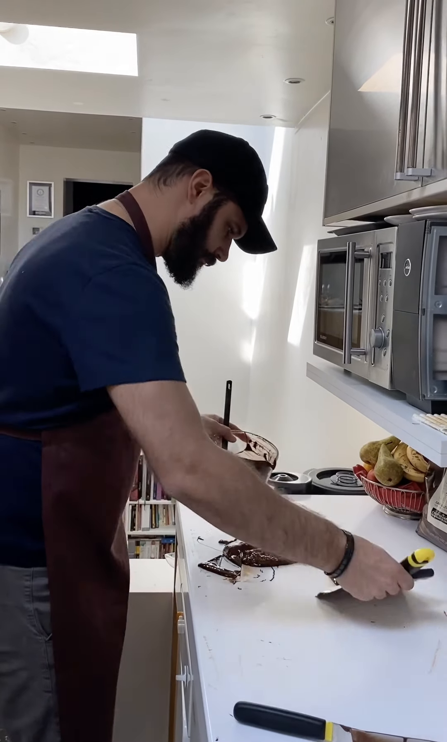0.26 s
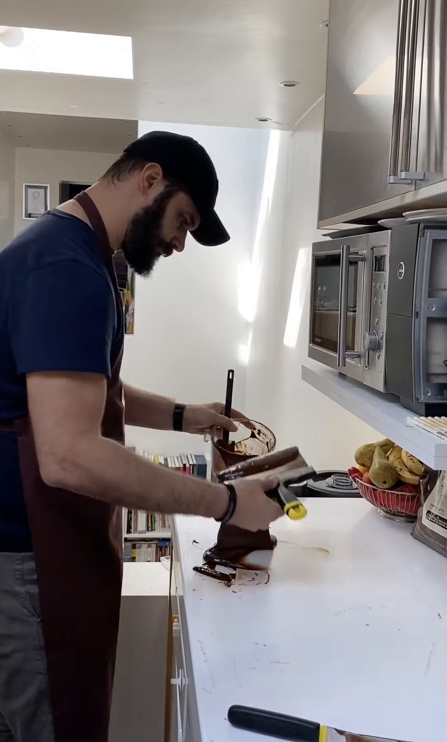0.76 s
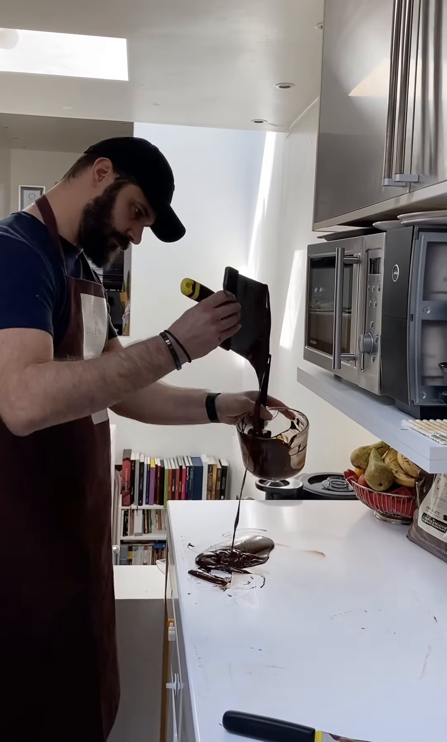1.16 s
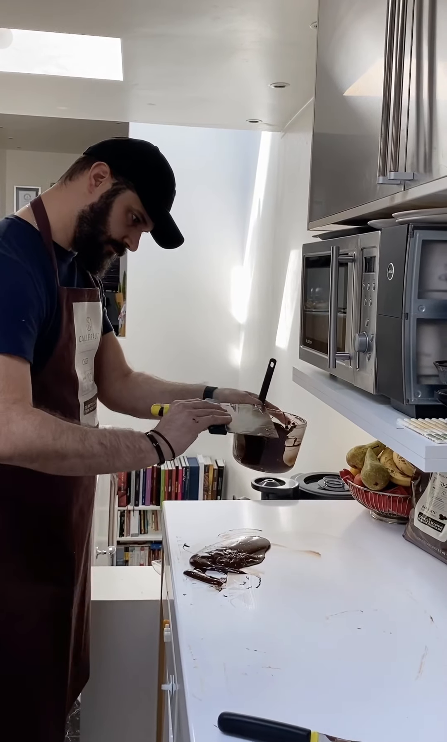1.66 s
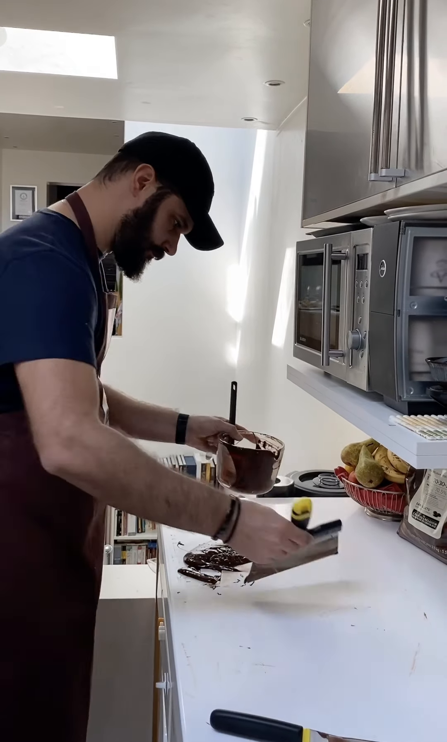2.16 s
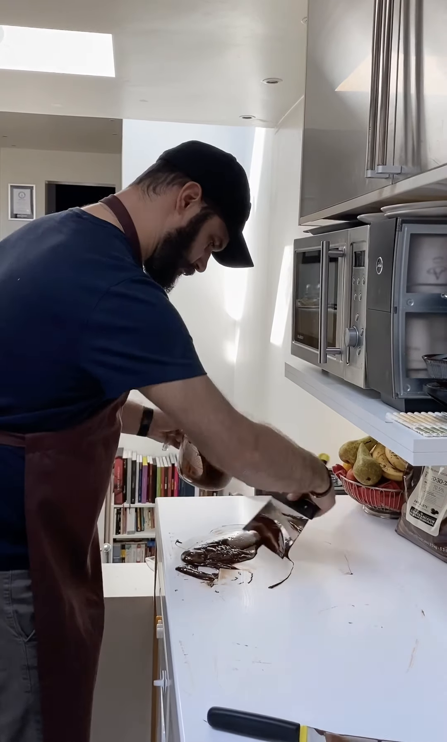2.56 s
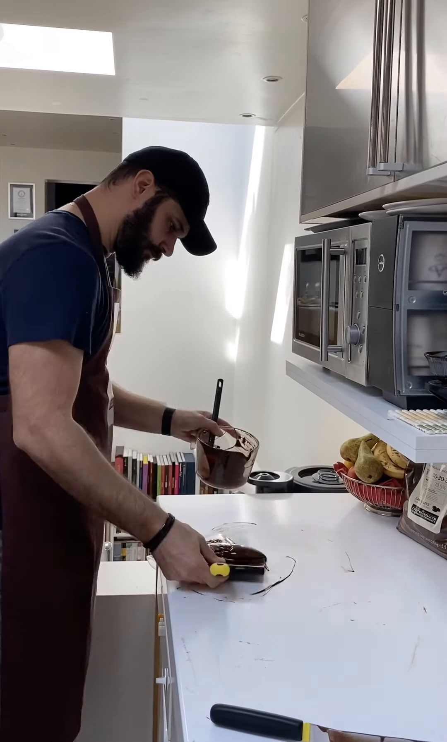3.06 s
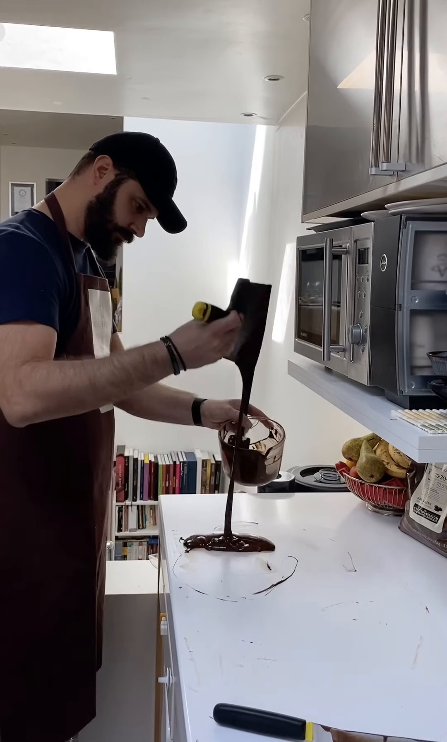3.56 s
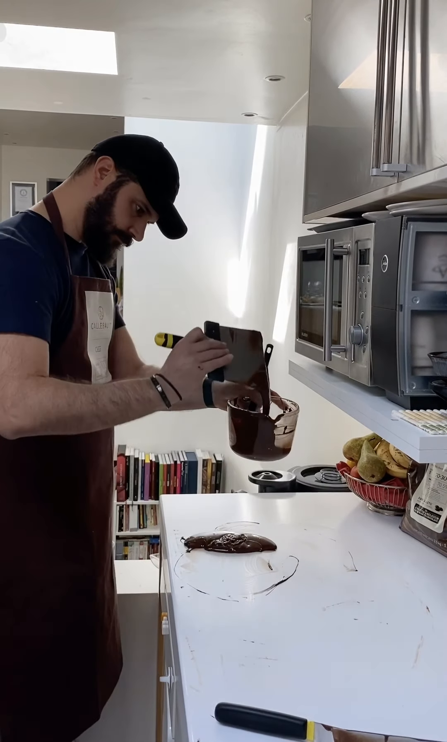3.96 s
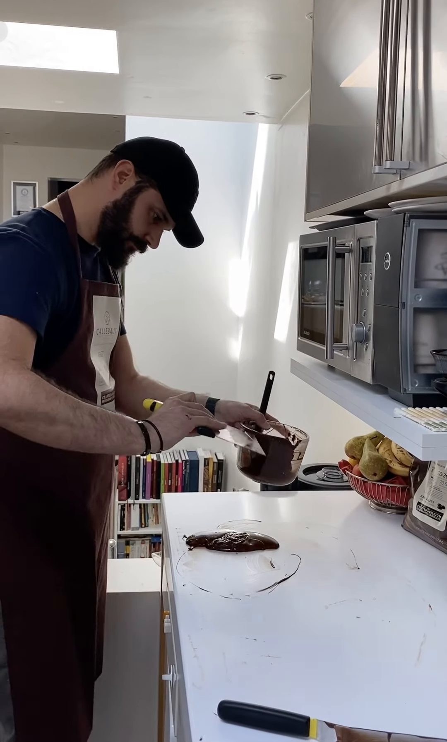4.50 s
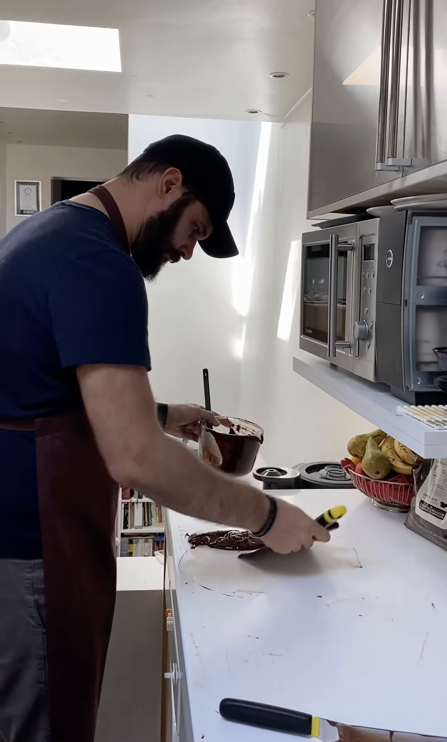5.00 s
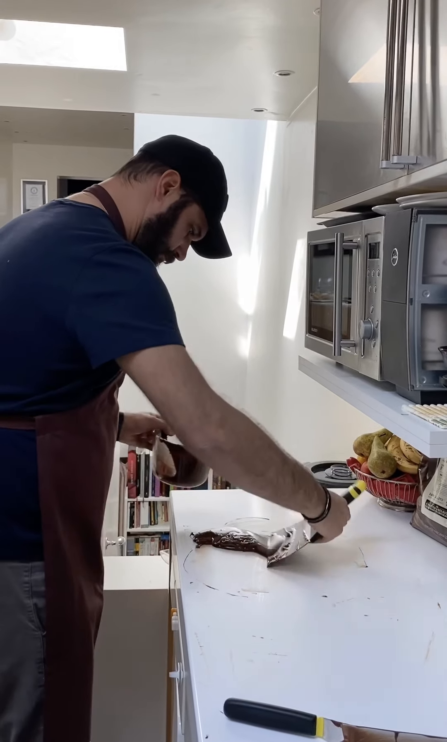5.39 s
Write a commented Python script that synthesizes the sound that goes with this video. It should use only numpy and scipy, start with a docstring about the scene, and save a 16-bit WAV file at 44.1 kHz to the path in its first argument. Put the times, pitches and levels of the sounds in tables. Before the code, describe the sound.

A lively hard-surfaced kitchen heard in stereo from fairly near, with a very quiet low refrigerator hum and soft fan rush throughout. After a slight touch near 0.06 s, a steel scraper strikes the worktop at about 0.13 s with a very loud, sharp, ringing clack, then sweeps with a bright gritty hiss and hollow drone until about 0.5 s. Soft, nearly inaudible chocolate smears follow, with light ticks and wiping on a bowl rim around 1.4-1.9 s. At 2.25 s a weaker, rapidly rattling clack begins a longer fading scrape, with dull knocks around 2.6-2.75 s and another push at 2.85-3.1 s ending in a low thud. Quiet wiping returns around 3.9-4.2 s, then a crisp tick at 4.46 s and dull knocks. At 4.77 s another loud clack starts a scrape, with a small upward squeak near 4.95 s, a further stroke around 5.1-5.5 s and a short final one.

```python
"""In a hard-walled kitchen, a steel scraper works melted chocolate on the worktop.
Three times it clacks down (short pulses that set slab and blade ringing) and is dragged across (noise of tiny slips).
Between the strokes the blade is wiped on the rim of a bowl (soft noise), with light ticks and slides and dull knocks.
Thuds and faint gliding noise join in, the room rings briefly, and refrigerators hum (wandering tones, soft noise)."""
import sys
import numpy as np
from scipy import signal
from scipy.fft import rfft, irfft
from scipy.io import wavfile
from scipy.ndimage import uniform_filter1d

SR = 44100
rng = np.random.default_rng(int(sys.argv[2]) if len(sys.argv) > 2 else 0)


def persist_wave(psi):
    """Save psi, clipped to +-1, as 16-bit WAV."""
    counts = np.round(np.clip(psi, -1, 1) * 32767).astype(np.int16)
    wavfile.write(sys.argv[1], SR, np.atleast_2d(counts).T)


N = 248724
TIME = np.arange(N) / SR
TAIL = SR * 3 // 5  # samples of ringing kept after a contact

# Blade meets worktop: (time [s], strength [dB], treble [dB], flatness [0 on a corner - 1 on the whole edge],
# blade rattle against the blow [dB], contacts [count], time between contacts [s])
CLACKS = [(0.0638, -13, -4, 1, -10, 1, 0), (0.1289, 12.5, -2.5, .03, -12.5, 1, 0.019),
          (0.1466, 3.5, -2.5, .15, -3, 1, 0), (2.2465, 0.5, -2, 0.52, -6, 4, .0031),
          (2.2917, -10.5, -16, .05, -14, 2, .0068), (4.7382, -9.5, -24, 1, -0.5, 1, 0),
          (4.7678, 10, -8, 0.19, -6, 2, 0.0038)]
# Tone colour of the blow: (frequency [Hz], level [dB])
CLACK_COLOUR = [(30, -25.5), (60, -12.5), (110, -17), (170, -12), (300, -17.5), (520, -12.5), (790, -2.5),
                (1220, -5.5), (1550, -15.5), (1950, -6), (2400, -19), (3800, -11.5), (7000, -21.5),
                (15000, -36.5)]
# Tone colour of the blade's rattle: (frequency [Hz], level [dB])
RATTLE_COLOUR = [(300, -24), (1400, -5), (2000, -2), (2500, -1.5), (3800, -2), (6000, -2), (9000, -11.5),
                 (15000, -18.5)]
# Ringing of worktop and blade: (frequency [Hz], relative level [dB], time to fall by 60 dB [s])
RINGING_MODES = [(165.2, -2.5, 0.33), (186, -8, 0.39), (276.7, -14, 0.28), (439, -3, 0.35),
                 (600, -11, 0.32), (749, -2, .35), (813, -1, 0.35), (800, -1.5, 0.13), (936, -5, 0.29),
                 (928, -7.5, 0.37), (1037, -5.5, 0.21), (1179, 2, 0.38), (1203, -3.5, 0.2), (1267, 2, 0.16),
                 (1315, -6, 0.19), (1427, -6, 0.4), (1421, -14.5, 0.15), (1883, -10.5, .3),
                 (1830, -11, 0.14), (1926, -8.5, .32), (2056, -7.5, 0.23), (2210, -6.5, .35),
                 (2640, -15, 0.52), (2920, -19.5, 0.38), (2876, -16.5, .33), (4060, -7.5, .47),
                 (4100, -11, 0.27), (5663, -16.5, .25), (7300, -19, .22)]
# What flatness does to a blow: (on a corner [dB], on the whole edge [dB])
BASS_DB, RINGING_DB, ROOM_DB = (-6, 15), (-45, -50), (-7, 2)
BOUNCE_LOSS_DB_PER_S = 516  # later contacts of one clack are weaker


def clacks(ring_rise=0.0039, ring_lean_db=-0.8, rattle_time=0.0065):
    """The edge strikes, rattles and bounces; slab and blade ring on. A flat landing is deeper and more diffuse."""
    out, t = np.zeros((2, N)), TIME[:TAIL]
    mode_hz, mode_db, t60 = np.transpose(RINGING_MODES)[:, :, None]
    swing = np.exp((2j * np.pi * mode_hz - np.log(1000) / t60) * t)
    modes = amp(mode_db) * swing * (1 - np.exp(-t / ring_rise))
    signs = (-1) ** np.arange(len(RINGING_MODES))  # neighbours swing oppositely
    ring_lean = amp([[ring_lean_db], [-ring_lean_db]])  # left, right
    for s, strength_db, treble_db, flatness, rattle_db, count, gap in CLACKS:
        bass_db = np.interp(flatness, [0, 1], BASS_DB)
        ringing_db = np.interp(flatness, [0, 1], RINGING_DB)
        room_db = np.interp(flatness, [0, 1], ROOM_DB)
        blow = click(CLACK_COLOUR, treble_db, bass_db)
        size = len(blow)
        for delay in gap * np.arange(round(count)):
            db = strength_db - BOUNCE_LOSS_DB_PER_S * delay
            chatter = rng.standard_normal(size) * np.exp(-t[:size] / rattle_time)
            rattle = steel(signal.fftconvolve(chatter, click(RATTLE_COLOUR, 0, 0))[:size])
            strike = blow + amp(rattle_db) * rattle / np.linalg.norm(rattle)
            add(out, s + delay, amp(db) * kitchen(strike, room_db))
            # each mode radiates in its own direction, so its timing differs left and right
            arrival = rng.uniform(-0.00011, 0.000059, (2, len(RINGING_MODES)))
            ring = (np.exp(2j * np.pi * mode_hz.T * arrival) * signs @ modes).imag
            add(out, s + delay, amp(db + ringing_db) * ring_lean * ring)
    return out


# Tone colour of the dragged edge: (frequency [Hz], level [dB])
HISS_COLOUR = [(300, -38.5), (1500, -13), (2300, -4.5), (2850, -3.5), (3300, -0.5), (4200, 0.5), (5000, -3),
               (5700, 0.5), (7500, -4), (10000, -5.5), (13000, -5.5), (16000, -5.5)]
# Tone colour of the droning worktop: (frequency [Hz], level [dB])
DRONE_COLOUR = [(100, -18.5), (250, -6), (500, -10), (820, -2), (1000, -1.5), (1180, 0.5), (1400, -5.5),
                (1620, -8), (2000, -1.5), (2500, -8), (4000, -24.5), (10000, -48)]
# Pushes of the blade over the worktop: (start [s], speeding up [s], slowing down [s], hiss [dB],
# brightness: treble up and the rest down by this [dB], worktop drone [dB])
PUSHES = [(0.135, 0.16, 0.17, -32.5, 1.1, -47), (2.25, 0.013, 0.62, -39, 2, -54.5),
          (2.5, 0.29, 0.23, -47.5, 1.5, -61.5), (2.84, 0.17, 0.093, -39, 0, -53),
          (4.77, 0.09, 0.42, -37.5, 3, -51.5), (5.11, 0.26, 0.17, -44, 1.5, -57.5),
          (5.495, 0.094, 0.14, -44, -0.5, -51)]
SPEED_POWER = 2.18  # the gain of the friction noise follows this power of the speed


def strokes(split_hz=5600, drone_power=.85, brightening=.12):
    """The dragged edge hisses, brighter with its speed and angle, and sets the worktop droning."""
    hiss = unit(steel(friction(HISS_COLOUR, 8000, 1.2, 0.785, 2.6)))
    drone = friction(DRONE_COLOUR, 1500, 2.4, 0.99, 2.6)
    dull = signal.sosfiltfilt(signal.butter(2, split_hz, fs=SR, output="sos"), hiss)
    bright = hiss - dull
    dull_gains, bright_gains, drone_gains = [], [], []
    for start, speeding, slowing, hiss_db, bright_db, drone_db in PUSHES:
        edge = movement(start, speeding, slowing, SPEED_POWER)
        dull_gains.append(amp(hiss_db - bright_db) * edge ** (1 - brightening))
        bright_gains.append(amp(hiss_db + bright_db) * edge ** (1 + brightening))
        drone_gains.append(amp(drone_db) * movement(start, speeding, slowing, drone_power))
    return dull * together(dull_gains) + bright * together(bright_gains) + drone * together(drone_gains)


# Faint bands of gliding noise in the strokes and wipes, from narrow squeaks to broad swells:
# (start [s], length [s], starting pitch [Hz], width [Hz], rms before fades and room [dB])
GLIDES = [(0.198, 0.19, 1107, 300, -54.5), (0.26, 0.077, 5760, 900, -51), (1.613, 0.032, 1610, 60, -66),
          (2.82, 0.092, 1224, 162, -58.5), (4.928, 0.035, 4222, 120, -44), (4.951, 0.065, 3703, 250, -43.5),
          (5.559, 0.19, 1952, 45, -58.5)]
GLIDE_OCTAVES_PER_S = 0.554  # every band glides upward


def glides():
    """Noise kept in a band around a rising pitch: a narrow band squeaks, a broad one swells softly."""
    out = np.zeros((2, N))
    for start, length, hz, width, db in GLIDES:
        size = max(round(length * SR), 256)
        pitch = hz * 2 ** (GLIDE_OCTAVES_PER_S * TIME[:size])
        turn = np.exp(2j * np.pi * np.cumsum(pitch) / SR)
        noise = ([1, 1j] @ rng.standard_normal((2, SR)))[:size]
        fuzz = signal.lfilter([1], [1, -np.exp(-np.pi * width / SR)], noise)
        band = unit((turn * fuzz).real) * signal.windows.tukey(size, .5)
        add(out, start, amp(db) * kitchen(band, room_db=-2.5))
    return out


# The worktop booms as weight comes on or off: (time [s], level [dB], pitch [Hz], time to fall by 60 dB [s])
THUDS = [(0.136, -46, 61.4, 0.53), (2.248, -32, 178, .25), (2.254, -53, 57, 0.42), (3.079, -39.5, 53, 0.38),
         (4.773, -35, 44.4, 0.26)]


def thuds(rise=.012):
    """Low swings of the worktop: each is a sine that swells quickly and dies away."""
    out = np.zeros(N)
    for s, db, hz, t60 in THUDS:
        t = np.maximum(TIME - s, 0)
        fade = np.exp(-np.log(1000) * t / t60) * (1 - np.exp(-t / rise))
        out += amp(db) * np.sin(2 * np.pi * hz * t) * fade
    return out


# Light ticks and slides of the blade, on the bowl rim or just before it lands:
# (time [s], strength [dB], treble [dB], bass [dB], decay of the slips [s])
TICKS = [(1.419, -43, -14, 0, 0.011), (1.888, -24.5, 2, 11.5, 0.008), (2.192, -39.5, -24, -0.5, 0.026),
         (4.4564, -18, -4.5, -1.5, 0.0057)]
# Tone colour of a tick or slide: (frequency [Hz], level [dB])
TICK_COLOUR = [(200, -20), (900, -4.5), (1700, -7), (2300, -5.5), (3300, 2.5), (4600, -0.5), (6200, 1.5),
               (7400, 1.5), (9000, -4), (15000, -10.5)]


def ticks():
    """Light ticks and slides of the blade: mostly bright, short runs of slips, with much room sound."""
    return taps(TICKS, TICK_COLOUR, room_db=7.0)


# Dull knocks of bowl and handle: (time [s], strength [dB], treble [dB], bass [dB], decay of the contact [s])
KNOCKS = [(1.4425, -32.5, 11.5, -7, 0.0032), (2.635, -36, -5, -25, 0.0091), (2.752, -31, -5.5, 1.5, 0.017),
          (4.526, -27, -5, -6.5, .012), (4.548, -29, -17, 6.5, 0.019), (5.263, -27, 0, 3.5, 0.0058)]
# Tone colour of a knock: (frequency [Hz], level [dB])
KNOCK_COLOUR = [(50, -27), (160, 0), (380, -2), (680, -6), (1100, -17), (3000, -35), (12000, -75)]


def knocks():
    """Bowl and handle touch dully: mostly low pitches, with less room sound."""
    return taps(KNOCKS, KNOCK_COLOUR, room_db=-3.0)


def taps(rows, colour, room_db):
    """A light contact is a short dying run of slips; the room spreads it."""
    out, t = np.zeros((2, N)), np.arange(4096) / SR
    for s, db, treble_db, bass_db, length in rows:
        slips = rng.standard_normal(len(t)) * np.exp(-t / length)
        sound = steel(signal.fftconvolve(slips, click(colour, treble_db, bass_db))[:len(t)])
        # strength sets the level of the room sound; the straight path is room_db below it
        add(out, s, amp(db - room_db) * kitchen(sound / np.linalg.norm(sound), room_db))
    return out


# Wet smears of chocolate on blade and rim:
# (start [s], speeding up [s], slowing down [s], hiss [dB], body [dB])
WIPES = [(0.48, 0.28, 0.28, -74, -70), (0.83, .21, 0.073, -64, -70), (1.41, .02, 0.12, -64.5, -65.5),
         (1.489, 0.066, 0.11, -58, -63), (1.62, 0.13, 0.13, -70.5, -68.5), (1.9, 0.54, 0.28, -66, -70.5),
         (3.1, 0.19, 0.3, -72.5, -71), (3.63, 0.07, 0.044, -79.5, -75), (3.88, 0.37, 0.31, -65, -65.5),
         (4.03, 0.12, 0.092, -56, -64.5)]
# Tone colour of the sliding hiss: (frequency [Hz], level [dB])
WIPE_HISS_COLOUR = [(1000, -18), (2800, -2), (4000, -2.5), (6000, -8.5), (9000, -12.5), (16000, -21.5)]
# Tone colour of the fuller smear: (frequency [Hz], level [dB])
WIPE_BODY_COLOUR = [(200, -24.5), (700, -1.5), (1100, -11), (2100, -4), (3700, -20), (6000, -17),
                    (10000, -33)]


def wipes(body_power=0.61):
    """Soft chocolate slides along the blade and is smeared off on the rim."""
    hiss = friction(WIPE_HISS_COLOUR, 2700, 0.57, 0.32, 4.1)
    body = friction(WIPE_BODY_COLOUR, 1200, 0.94, 0.45, 3.0)
    edge = together([amp(hiss_db) * movement(*timing, SPEED_POWER) for *timing, hiss_db, _ in WIPES])
    smear = together([amp(body_db) * movement(*timing, body_power) for *timing, _, body_db in WIPES])
    return hiss * edge + body * smear


def friction(colour, slips_per_s, size_db, flutter_db, patchy_db):
    """Countless tiny slips of the edge; its narrow resonances come and go as the contact shifts."""
    slipping = rng.random(N) < slips_per_s / SR
    sizes = amp(size_db * np.minimum(rng.exponential(1, N), 4)) * slipping
    grains = sizes * rng.standard_normal((2, N))
    blurred = rng.standard_normal((2, N))  # steady noise: slips smeared by the walls
    z = signal.stft(diffuse(unit(grains) + blurred, colour), nperseg=1024)[2]
    patches = uniform_filter1d(rng.standard_normal(z.shape[1:]), size=3, axis=0)  # over pitch
    patches = unit(uniform_filter1d(patches, size=9, axis=1))  # over time
    shifting = signal.istft(z * amp(patchy_db * patches), nperseg=1024)[1][:, :N]
    return unit(shifting) * amp(flutter_db * wander(35))


LINGER_T60 = 0.44  # s for the noise of a movement to fall by 60 dB in the room


def movement(start, speeding, slowing, power):
    """Gain of one arm movement: the speed rises and falls smoothly, and the room lets the noise linger."""
    coarse = TIME[::64]
    speed = np.sin(np.pi / 2 * np.interp(coarse, np.cumsum([start, speeding, slowing]), [0, 1, 0]))
    keep = np.exp(-2 * np.log(1000) / LINGER_T60 * coarse[1])
    energy = signal.lfilter([1 - keep], [1, -keep], speed ** (2 * power))
    return np.interp(TIME, coarse, np.sqrt(energy))


def together(gains):
    """Overlapping movements add in power."""
    return np.linalg.norm(gains, axis=0)


# The steel blade's own resonances: (frequency [Hz], width [Hz], level over the rest [dB])
BLADE_RESONANCES = [(2830, 160, 3), (3185, 50, 2), (3830, 60, 1.5), (4320, 130, 2.5), (5650, 80, 2),
                    (5880, 200, 2), (6290, 70, 2), (7240, 90, 3), (7430, 50, 2.5), (9210, 90, 2.5)]


def steel(x):
    """Colours a sound with the blade's resonances."""
    size = x.shape[-1]
    hz = np.fft.rfftfreq(size, 1 / SR)
    boost_db = sum(db / (1 + (2 * (hz - f) / width) ** 2) for f, width, db in BLADE_RESONANCES)
    log_gain = np.log(amp(boost_db))
    # causal: it rings after the push
    phase = signal.hilbert(np.r_[log_gain, log_gain[-2:0:-1]]).imag[:len(hz)]
    return irfft(rfft(x) * np.exp(log_gain - 1j * phase), size)


def click(colour, treble_db, bass_db, spread=.0013, treble_hz=2500, bass_hz=400, size=4096):
    """A causal pulse of energy 1; bending waves bring its treble first and its bass later."""
    hz = np.fft.rfftfreq(size, 1 / SR) + 1
    treble = treble_db / (1 + (treble_hz / hz) ** 2)
    bass = bass_db / (1 + (hz / bass_hz) ** 2)
    log_gain = np.log(amp(read(colour, hz) + treble + bass))
    causal = np.conj(signal.hilbert(np.r_[log_gain, log_gain[-2:0:-1]]))[:len(hz)]
    bending = 4 * np.pi * spread * np.sqrt(1000 * hz)  # spread is the delay at 1000 Hz in s
    pulse = irfft(np.exp(causal - 1j * bending))
    return pulse / np.linalg.norm(pulse)


# How long the kitchen rings: (frequency [Hz], time to fall by 60 dB [s])
ROOM_T60 = [(60, 0.31), (170, 0.74), (500, .48), (1200, 0.39), (4000, 0.47), (8000, 0.39), (15000, 0.1)]
# Bursts of scattered sound from cupboards, ceiling and walls: (delay [s], level on top of room_db [dB], decay [s])
ECHOES = [(.003, 0.5, 0.0024), (0.0149, -5.5, .005), (0.027, -15.5, .003)]


def kitchen(sound, room_db, lag=.00011, build_up=0.00082, near_db=1.5):
    """The straight path, scattered early echoes and a diffuse tail, drawn afresh for every sound."""
    hz, t, z = signal.stft(diffuse(rng.standard_normal((2, TAIL))), SR, nperseg=256)
    fading = z * amp(-60 * t / read(ROOM_T60, hz)[:, None])
    tail = signal.istft(fading, SR, nperseg=256)[1][:, :TAIL]
    t = TIME[:TAIL]
    paths = amp(room_db) * unit(tail * (1 - np.exp(-t / build_up))) / np.sqrt(TAIL)
    scatter = diffuse(rng.standard_normal((2, TAIL)))
    for delay, db, length in ECHOES:
        burst = scatter * (t > delay) * np.exp(-abs(t - delay) / length)
        paths += amp(db + room_db) * unit(burst) / np.sqrt(TAIL)
    # the straight path comes to the left first and louder
    paths[0, 0] += amp(near_db / 2)
    paths[1, round(lag * SR)] += amp(-near_db / 2)
    return signal.fftconvolve(sound[None], paths, axes=1)


# How alike left and right are: (frequency [Hz], correlation [-1 to 1])
LIKENESS = [(60, 0.92), (150, 0.93), (300, 0.76), (700, 0.0088), (1300, 0.56), (2300, .15), (4000, -0.2),
            (6000, 0.11), (9000, 0.1), (13000, -1)]
# Which side is louder: (frequency [Hz], left minus right [dB])
BALANCE = [(200, 0.5), (600, 2), (1200, 2.5), (2300, -0.5), (5000, -1.4), (9000, 0)]


def diffuse(two, colour=((1, 0), (2, 0))):
    """Colours two unrelated noises and blends them to the left-right likeness and balance of each frequency."""
    size = two.shape[1]
    hz = np.fft.rfftfreq(size, 1 / SR)
    same = np.clip(read(LIKENESS, hz), -1, 1)
    lean = amp(read(BALANCE, hz) / 2)
    mid, side = rfft(two) * np.sqrt([1 + same, 1 - same]) * amp(read(colour, hz))
    return unit(irfft([(mid + side) * lean, (mid - side) / lean], size))


# Refrigerator motors: (frequency [Hz], rms level [dB])
MOTOR_HUM = [(49.4, -66.5), (63.3, -70), (67.2, -69), (79.9, -62.5), (90.8, -63), (98.2, -68), (169, -80.5),
             (181, -76), (269.7, -76), (294.7, -78)]
# Tone colour of the fans' rush: (frequency [Hz], level [dB])
FAN_COLOUR = [(20, -25), (45, -1.5), (75, 0), (120, -9), (200, -5), (330, -7), (520, -14), (850, -14),
              (1250, -20), (1600, -25.5), (2300, -19.5), (4000, -29.5), (7000, -38.5), (15000, -50)]
FAN_DB = -63.5  # rms level of the rush


def refrigerators(drift=.07, waver_db=-0.26):
    """Several motors beat against each other over the soft rush of their fans."""
    hum = np.zeros(N)
    for hz, db in MOTOR_HUM:
        level = amp(db + waver_db * wander(1.5))
        cycles = hz * TIME + rng.random() + drift * wander(0.96)
        hum += level * np.sin(2 * np.pi * cycles)
    return np.sqrt(2) * hum + amp(FAN_DB) * diffuse(rng.standard_normal((2, N)), FAN_COLOUR)


def wander(rate):
    """Random drift of rms 1, with little movement faster than rate (Hz)."""
    coarse = TIME[::64]
    hz = np.fft.rfftfreq(len(coarse), coarse[1])
    drift = irfft(rfft(rng.standard_normal(len(coarse))) / (1 + (hz / rate) ** 4), len(coarse))
    return np.interp(TIME, coarse, unit(drift))


def amp(db):
    """Decibels to gain."""
    return 10 ** (np.asarray(db) / 20)


def unit(x):
    """Scales to rms 1."""
    return x / np.sqrt(np.mean(x ** 2) + 1e-20)


def read(points, hz):
    """Reads a table on a log-frequency axis."""
    f, value = np.transpose(points)
    return np.interp(np.log(hz + 1), np.log(f + 1), value)


def add(mix, s, sound):
    """Mixes a stereo sound in at time s."""
    part = mix[:, round(s * SR):][:, :sound.shape[1]]
    part += sound[:, :part.shape[1]]


def scene():
    """Everything in the kitchen, from the scraper to the refrigerators."""
    blade_on_worktop = clacks() + strokes() + glides() + thuds()
    small_contacts = ticks() + knocks() + wipes()
    return blade_on_worktop + small_contacts + refrigerators()


def record(dry, ceiling=1.2, low_cut_hz=34, top_hz=16000):
    """The microphones shed the deepest bass and round off the hardest peaks; then the top is cut."""
    lean = signal.sosfilt(signal.butter(6, low_cut_hz, "highpass", fs=SR, output="sos"), dry)
    rounded = ceiling * np.tanh(lean / ceiling)
    top_cut = signal.firwin(511, top_hz, window=("kaiser", 9), fs=SR)
    return signal.oaconvolve(rounded, top_cut[None], "same")


dry = scene()
out = record(dry)
persist_wave(out)
```